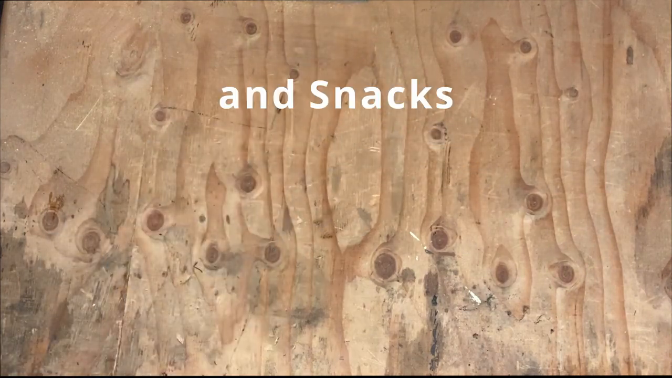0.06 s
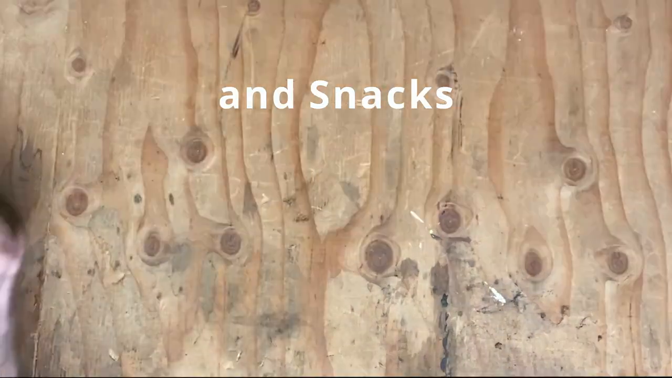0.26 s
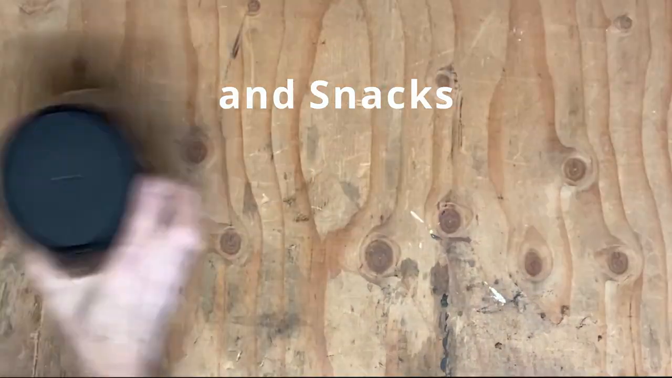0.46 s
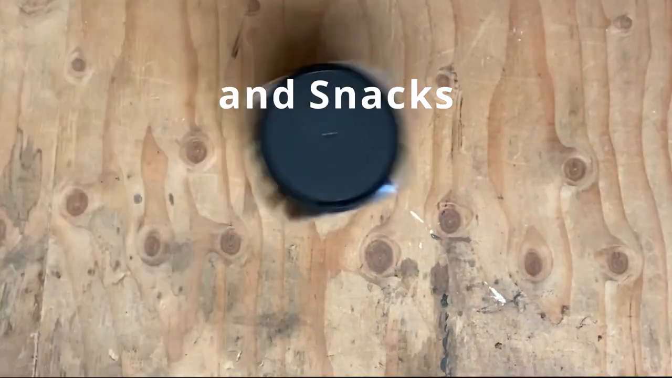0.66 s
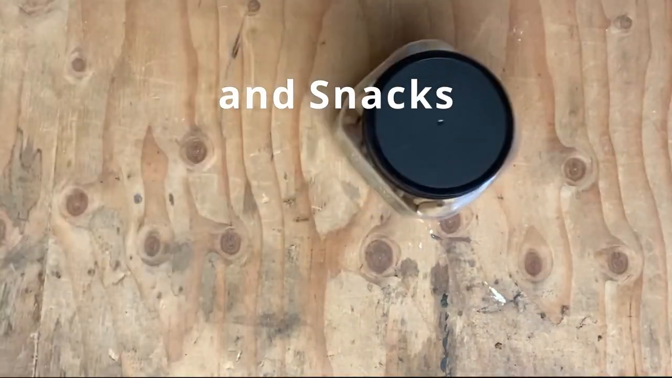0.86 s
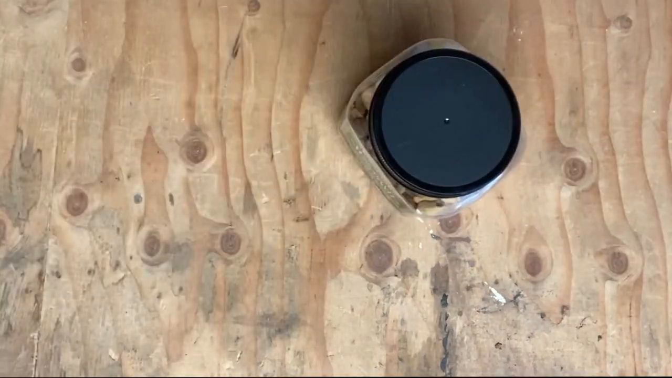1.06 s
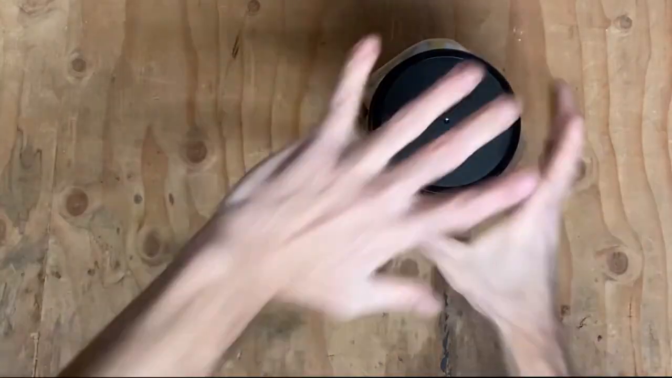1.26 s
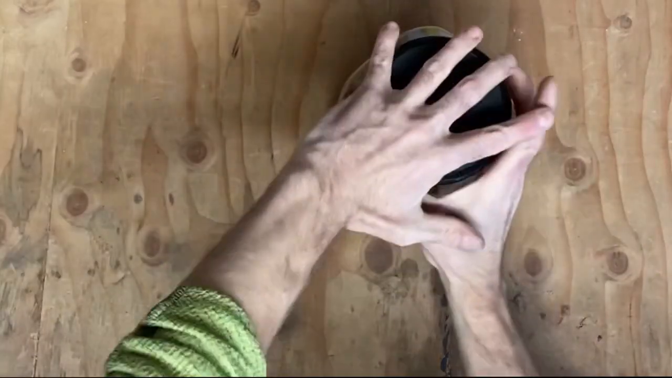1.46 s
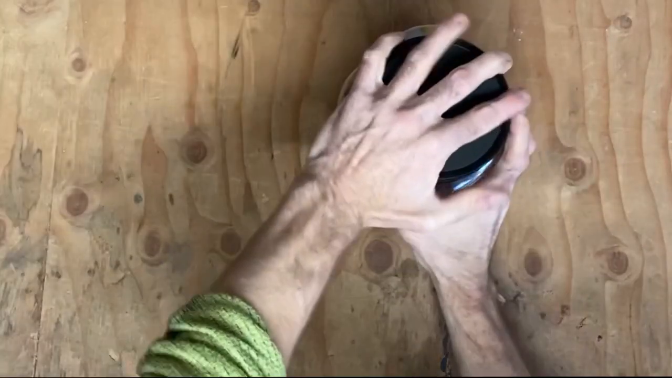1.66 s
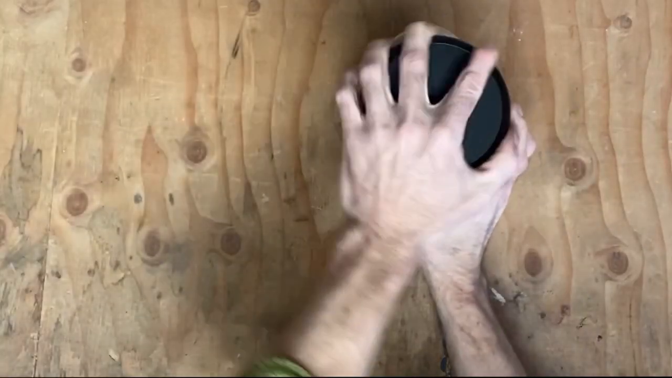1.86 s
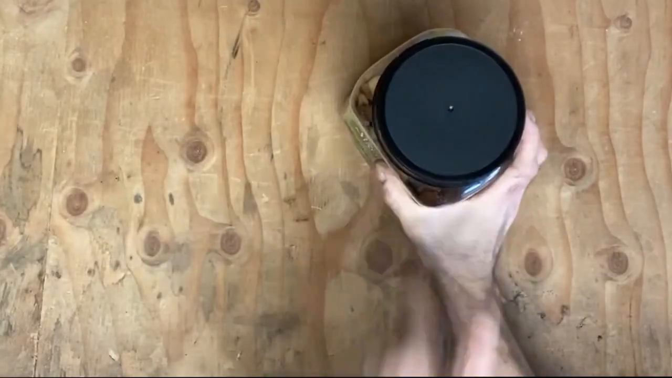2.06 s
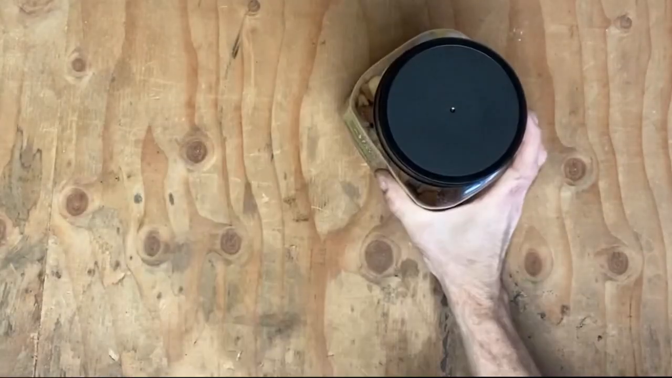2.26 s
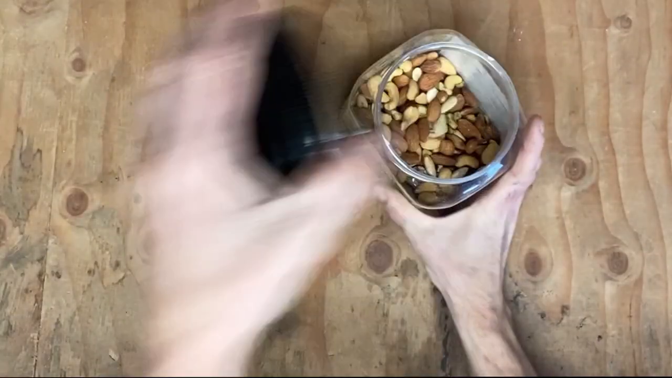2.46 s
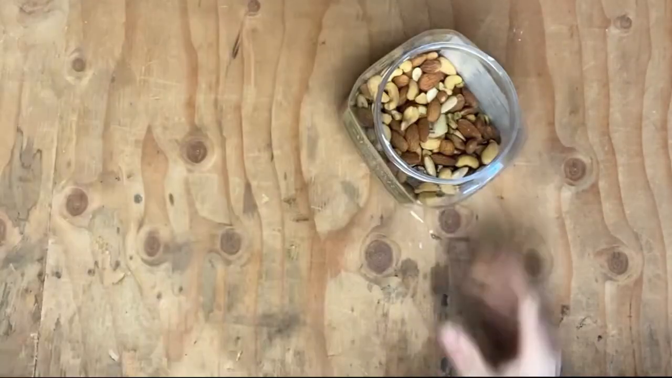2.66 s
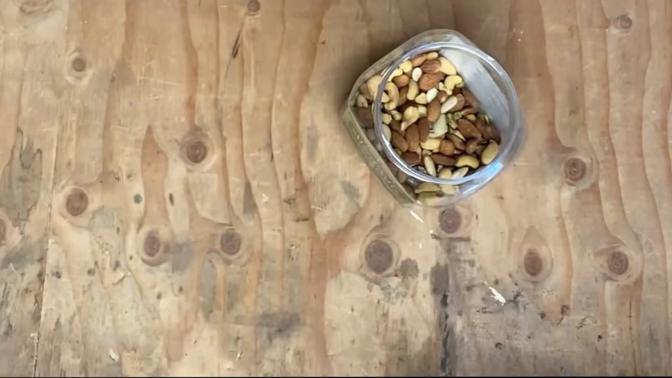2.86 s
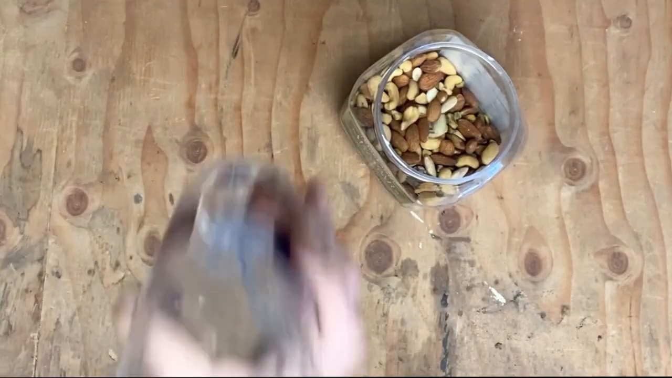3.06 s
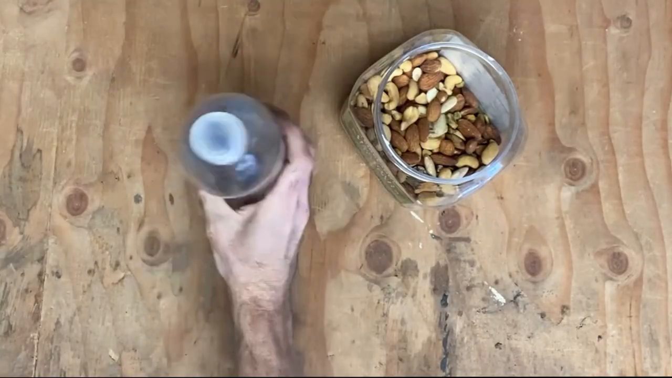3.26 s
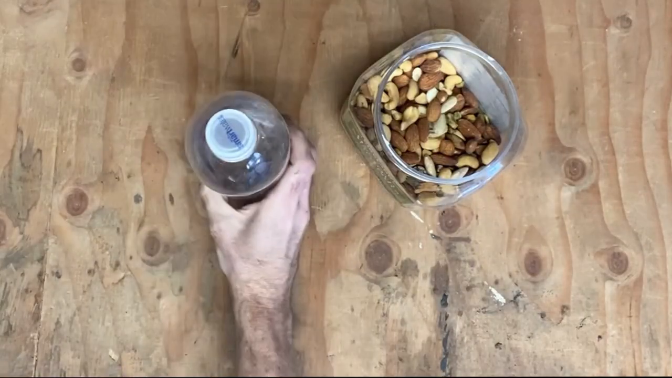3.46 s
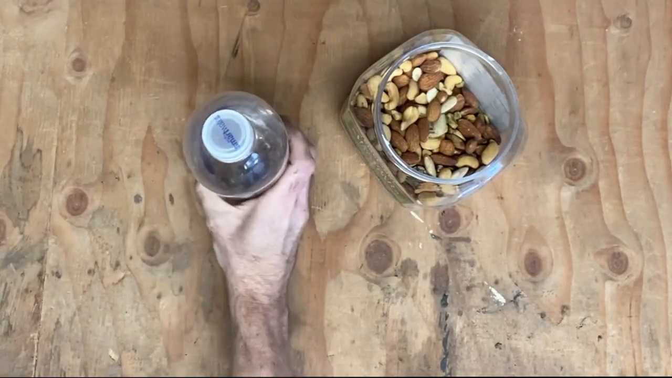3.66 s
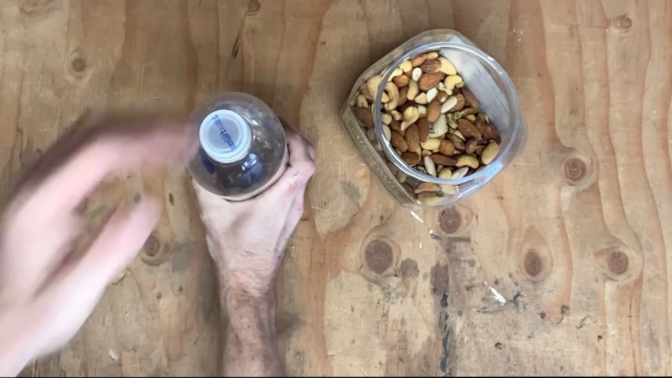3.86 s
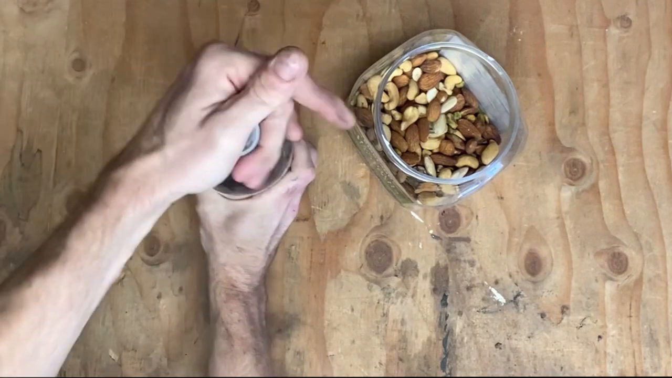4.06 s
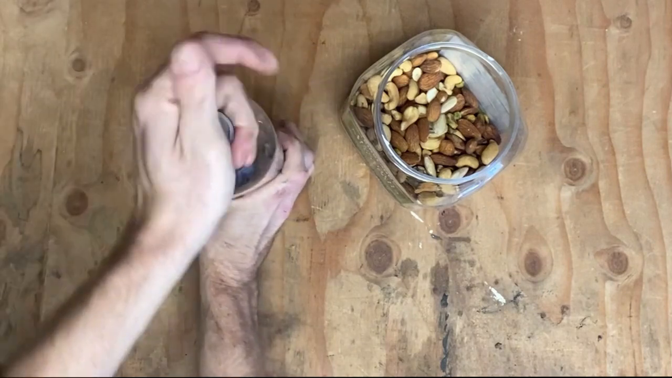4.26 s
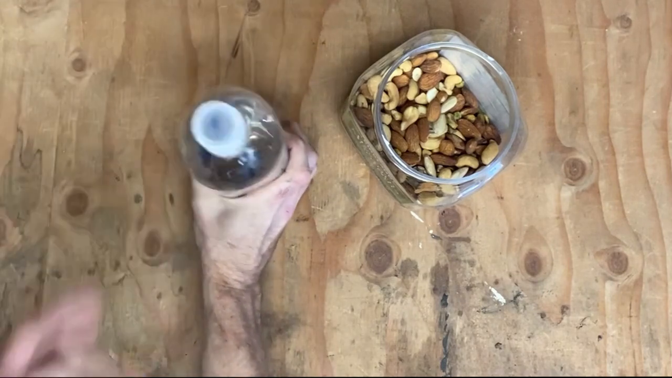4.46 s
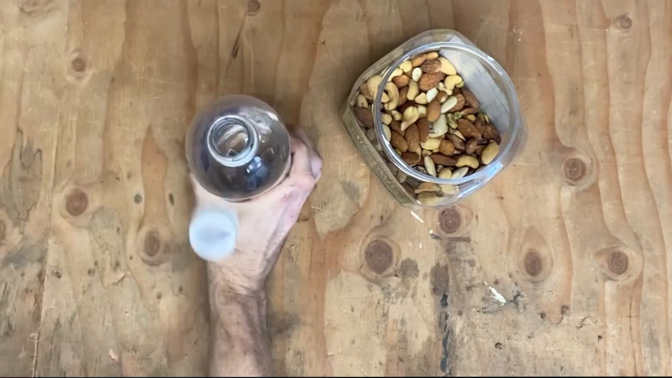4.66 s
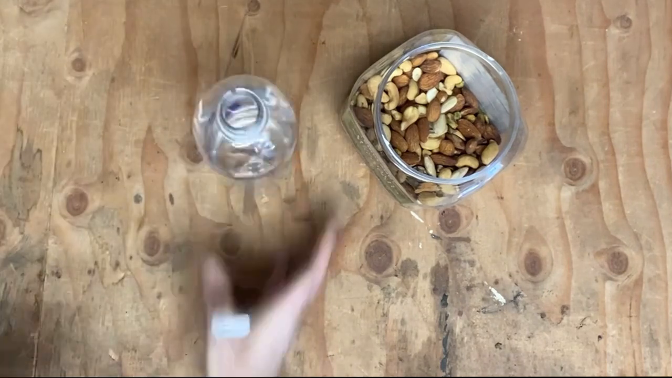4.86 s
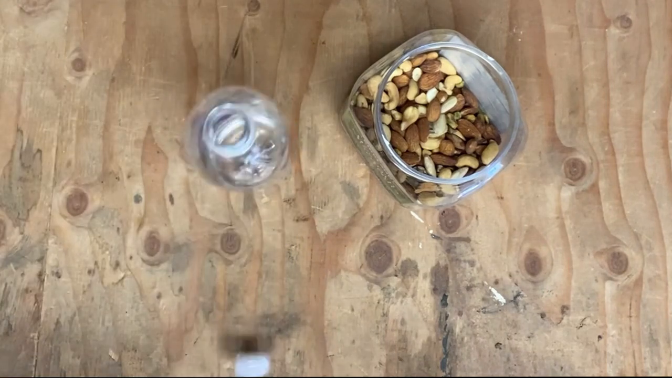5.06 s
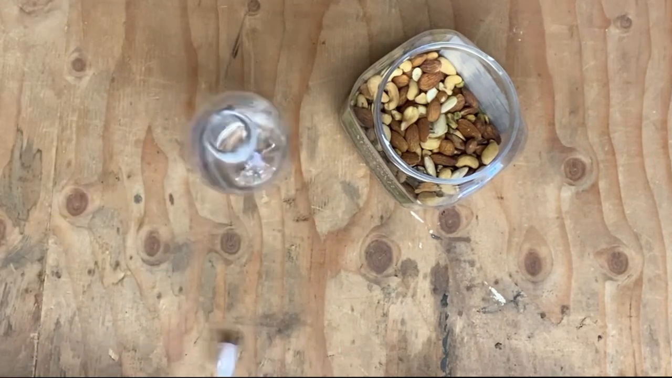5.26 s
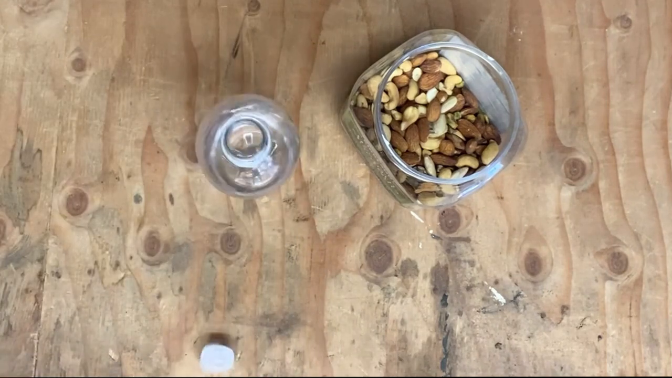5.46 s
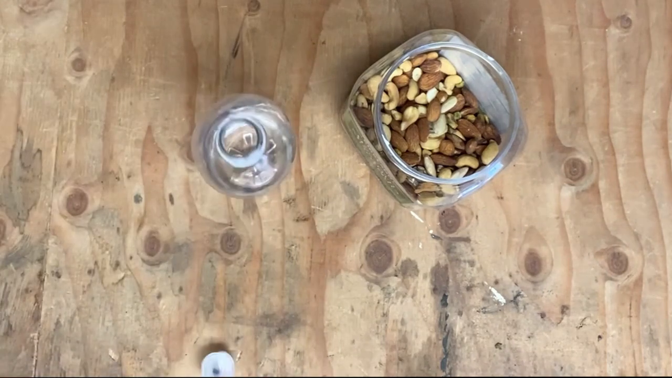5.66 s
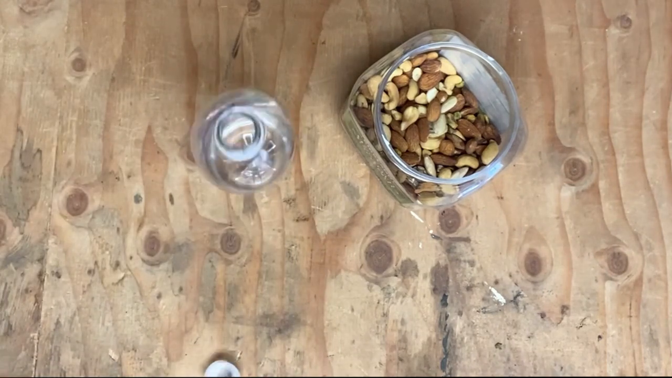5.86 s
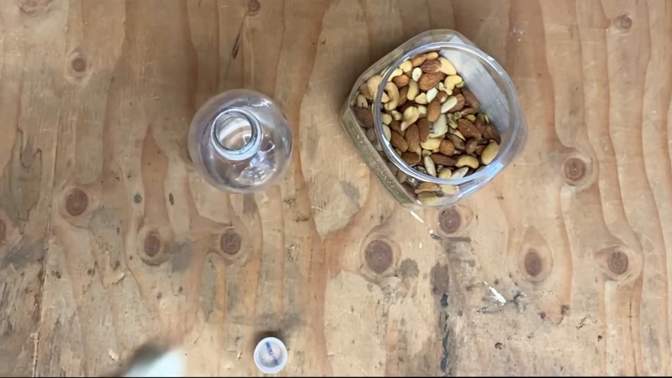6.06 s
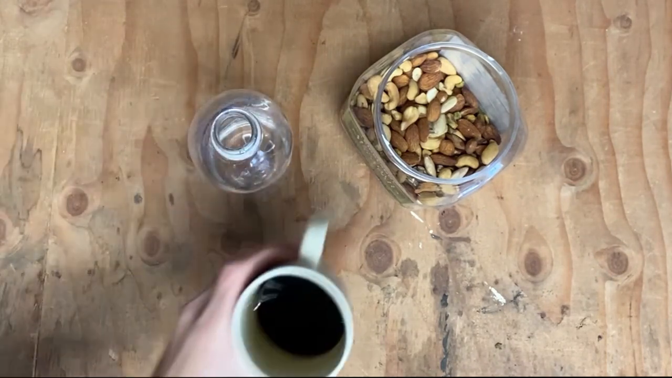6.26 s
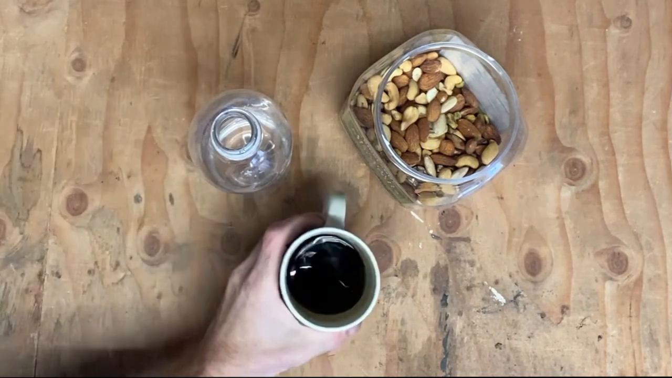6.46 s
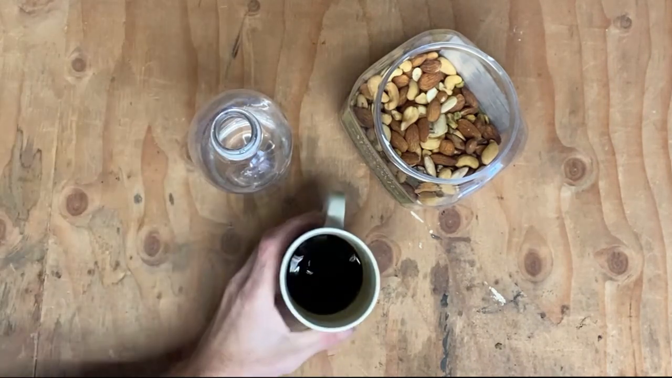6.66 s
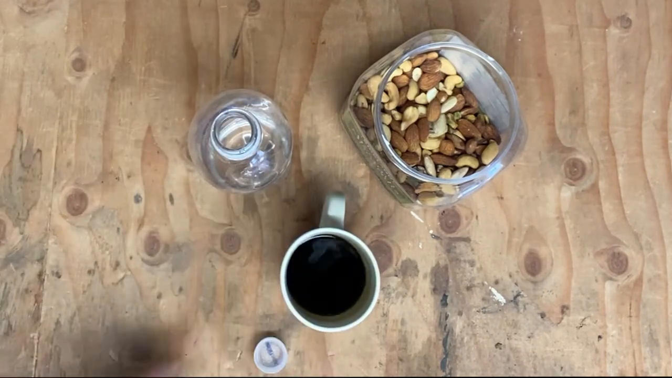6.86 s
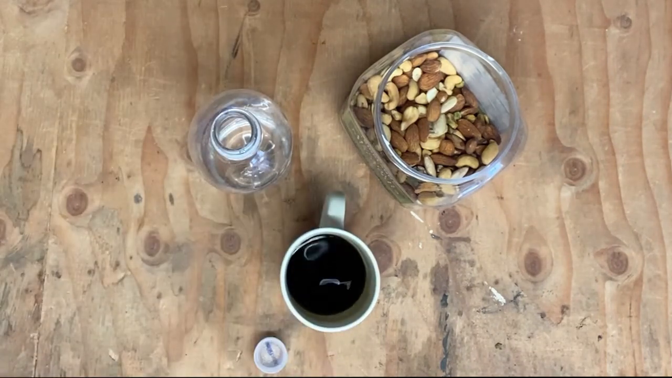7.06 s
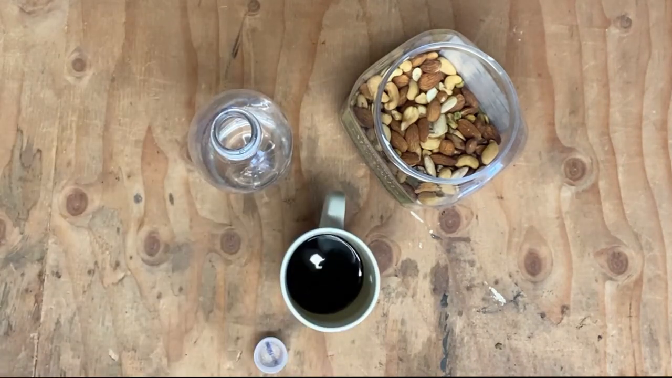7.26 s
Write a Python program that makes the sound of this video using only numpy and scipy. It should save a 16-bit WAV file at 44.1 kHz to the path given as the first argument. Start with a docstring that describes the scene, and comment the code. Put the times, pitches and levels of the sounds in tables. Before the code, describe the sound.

Close knocks and scrapes on wood as a jar and plastic bottle are opened, a cap bounces, and a mug lands.

```python
"""Jar, bottle and mug on a wooden table

A nut jar slides over the table and loses its screw lid; a plastic bottle is set down, its cap is
twisted off and bounces away; a full mug lands last. Impacts excite the damped modes of the thing
struck and, a moment later, of the table top; stick-slip friction sounds between the blows.
A phone held close above picks it all up in a small quiet room."""
import sys
import numpy as np
from scipy import signal
from scipy.fft import rfft, irfft, next_fast_len
from scipy.io import wavfile
from scipy.ndimage import uniform_filter1d

SR = 44100
rng = np.random.default_rng(int(sys.argv[2]) if len(sys.argv) > 2 else 0)


def log_audio(samples):
    """Write samples as a 16-bit WAV file to the path given in sys.argv[1]."""
    # one column per channel
    frames = np.atleast_2d(samples).T
    # limit to full scale, then quantise
    limited = np.clip(frames, -1, 1)
    pcm = np.round(limited * 32767).astype(np.int16)
    wavfile.write(sys.argv[1], SR, pcm)


N = 322812
T = np.arange(N) / SR
ANTIPHASE = np.array([[1], [-1]])
TWIST_DB_PER_S, HAND_DB_PER_S, HUM_DB_PER_S = (905, 498), (905, 256), (245, 150)  # rise, fall

# Normal modes. Each row: frequency in Hz, relative level in dB, t60 in seconds (body() limits the
# t60 of lid and cap). The table's first three rows are its bass modes, the rest its upper modes.
TABLE_MODES = [(64, -36, .16), (80.7, -4, 0.1), (100, -10.5, 0.092), (172.1, 4, 0.1), (225.2, 1.5, 0.079),
               (252, 3, 0.088), (330, -12, 0.027), (365, -12, 0.11)]
LID_MODES = [(400, -1, 0.034), (1100, 10, 0.028), (1520, 16, .025), (2190, 3.5, 0.0083), (3500, 4, .008),
             (4560, 14, 0.0091), (5270, 8, .008)]
CAP_MODES = [(1120, -2, 0.018), (1820, 4, 0.02), (2050, 5, 0.02), (2980, -2.5, 0.02), (3740, 16, 0.02),
             (4310, 9.5, 0.01), (5460, -15.5, 0.018), (6700, 27, 0.03)]
# Blows to the table top. Each row: start in seconds, peaks of the bass and upper modes in dB.
TABLE_THUMPS = [(0.227, -10.5, -5), (0.237, -2.5, -34), (0.342, -20, -22), (0.423, -8, -4.5),
                (0.498, -8, -11.5), (0.513, -25, -12.5), (0.558, -32, -24.5), (0.65, -47, -20),
                (1.371, -32, -42.5), (1.444, -24, -47), (1.82, -34.5, -36), (2.002, -40, -13),
                (2.016, -15, -21), (2.101, -30.5, -23.5), (2.331, -32.5, -42), (2.901, -30.5, -35.5),
                (3.227, -7, -7), (3.243, -7.5, -10), (3.259, -23, -22), (3.735, -35.5, -30.5),
                (3.982, -42, -32), (4.106, -27.5, -24.5), (4.377, -29, -22), (4.464, -31, -31.5),
                (4.742, -34, -31.5), (4.905, -29, -38.5), (5.031, -18.5, -23.5), (5.211, -25, -27),
                (5.298, -28, -34.5), (5.366, -28.5, -31), (5.5, -29, -30), (5.615, -28, -29),
                (5.639, -26.5, -32.5), (5.742, -27.5, -26), (5.849, -26, -43.5), (5.941, -30.5, -40),
                (6.263, -28.5, -29.5), (6.393, -7, -8.5), (6.402, -8, -6), (6.831, -21.5, -55),
                (6.873, -20.5, -27), (7.158, -22, -38.5)]
# Strokes of rubbing. Each row: start and hold in seconds, then levels in dB of the bright half,
# the dull half, the table's bass hum and its upper hum.
LID_STROKES = [(1.811, 0.028, -46, -51.5, -39, -57.5), (1.88, 0.068, -56, -63.5, -46.5, -72),
               (1.946, 0.043, -41.5, -49.5, -46, -57), (1.994, 0.013, -34, -33.5, -40, -38),
               (2.084, 0.0085, -34, -37, -37, -33.5)]
CAP_STROKES = [(4.196, 0.063, -48.5, -58, -48.5, -58.5), (4.29, 0.019, -55, -50, -49, -45),
               (4.352, 0.034, -34, -39.5, -45, -59), (4.4, 0.086, -42, -41.5, -55, -45),
               (4.5, 0.045, -51, -42, -51, -50.5)]
HAND_STROKES = [(0, 0.074, -64, -54.5, -42.5, -42.5), (1.304, 0.22, -65.5, -65, -43.5, -62),
                (1.419, 0.075, -57, -69, -40, -55), (1.55, 0.087, -60, -80, -66, -74),
                (1.69, 0.036, -58.5, -66, -47, -61), (2.337, 0.026, -69, -63, -53, -48.5),
                (2.429, 0.0084, -67, -78, -50, -75), (2.903, 0.068, -53.5, -68.5, -66, -78),
                (3.06, 0.22, -69.5, -86, -50, -71), (3.359, 0.099, -69.5, -60, -45, -45),
                (3.968, 0.037, -62.5, -62.5, -44, -61), (4.728, 0.012, -53.5, -53.5, -44, -56),
                (4.77, 0.077, -59.5, -85, -49.5, -56), (4.885, 0.1, -58, -67, -45, -59),
                (5.38, 0.039, -64, -58.5, -45.5, -57), (5.55, 0.067, -93, -61.5, -42.5, -58.5),
                (5.84, 0.06, -72.5, -57.5, -43, -50), (6.038, 0.0068, -53.5, -58.5, -40.5, -56.5),
                (6.091, 0.021, -65, -60.5, -40, -55.5), (6.2, 0.27, -71, -62.5, -53, -51),
                (6.45, 0.17, -67.5, -50, -34.5, -40), (6.772, 0.035, -47, -50.5, -42, -59),
                (6.849, 0.032, -64, -45, -26.5, -29.5), (6.898, 0.14, -66, -64.5, -47, -56),
                (7.06, 0.15, -69.5, -62.5, -33, -41), (7.19, 0.14, -73.5, -65, -43, -47)]


def undb(db):
    return 10 ** (np.asarray(db) / 20)


def unit(x):
    return x / np.sqrt(np.mean(x ** 2))


def peak(x, db):
    return x * undb(db) / np.abs(x).max()


def add(out, sound, s):
    i = int(s * SR)
    out[i:i + len(sound)] += sound[:len(out) - i]


def band(x, lo_hz, hi_hz):
    return signal.sosfilt(signal.butter(2, [lo_hz, hi_hz], "band", fs=SR, output="sos"), x)


def halves(x, split_hz=2500):
    """A crossover divides a sound into a dull and a bright half."""
    return [signal.sosfilt(signal.butter(4, split_hz, kind, fs=SR, output="sos"), x)
            for kind in ("low", "high")]


def colour(x, points):
    """Spectral shaping by (Hz, dB) points joined on a log axis."""
    size = next_fast_len(N + SR // 4)
    hz, db = np.transpose(points)
    gain = undb(np.interp(np.log(np.arange(size // 2 + 1) * SR / size + 1), np.log(hz), db))
    return irfft(rfft(x, size) * gain, size)[..., :N]


def ring(modes, scatter_db=0, detune=0, swell_cycles=0, size=SR // 3):
    """Free vibration is a sum of damped sines, here scattered at random in level and pitch."""
    hz, db, t60 = np.transpose(modes)[:, :, None]
    t = np.arange(size) / SR
    if scatter_db or detune:
        level_draw, pitch_draw = rng.standard_normal((2, len(modes), 1))
    else:
        level_draw = pitch_draw = 0
    gain = undb(db + scatter_db * level_draw) * (1 - np.exp(-t * hz / (swell_cycles + 1e-3)))
    sines = np.sin(2 * np.pi * hz * (1 + detune * pitch_draw) * t)
    return (gain * sines * 1000 ** (-t / t60)).sum(axis=0)


def body(modes, longest_s, longest_cycles=24):
    """Mode splitting: in thick plastic and clay each mode is a heavily damped cluster."""
    cluster = np.repeat(modes, 6, axis=0)
    cluster[:, 2] = np.minimum(cluster[:, 2], np.minimum(longest_s, longest_cycles / cluster[:, 0]))
    return ring(cluster, scatter_db=2.5, detune=.035, size=SR // 20)


def blows(events, modes, chatter_s, crack_db, lag_samples):
    """Impact excitation: a chattering contact radiates a crack and drives the body's modes."""
    out, t = np.zeros((2, N)), np.arange(SR // 10) / SR
    delay = np.exp(-2j * np.pi * lag_samples * np.fft.rfftfreq(len(t)))
    for s, dull_db, bright_db in events:
        chatter = rng.standard_normal(len(t)) * np.exp(-(t / chatter_s) ** 2)
        chatter *= np.clip(t / 0.00023, 0, 1)
        force = unit(chatter) / np.sqrt(len(t))
        force[0] += 1.2  # the first contact
        tone = signal.fftconvolve(body(modes, longest_s=.03), force)[:len(t)]
        dull, bright = halves(peak(tone, 0) + peak(band(chatter, 650, 6700), crack_db))
        sound = peak(dull, dull_db) + peak(bright, bright_db)
        late = irfft(rfft(sound) * delay, len(t))
        add(out[0], late * undb(-.75), s)  # later and softer on the left
        add(out[1], sound * undb(.75), s)
    return out


def grit(per_s, spread_db, smooth):
    """Stick-slip friction: catches of uneven size modulate a smooth hiss in each channel."""
    catches = (rng.random(N) < per_s / SR) * undb(np.clip(spread_db * rng.exponential(size=N), 0, 8))
    return (unit(uniform_filter1d(catches, SR // 300)) + smooth) * rng.standard_normal((2, N))


def resonate(friction, modes, hiss_db):
    """Forced vibration: friction drives a body's modes, and some hiss radiates directly."""
    tone = signal.fftconvolve(friction, body(modes, longest_s=.015)[None], axes=1)[:, :N]
    return unit(tone) + undb(hiss_db) * unit(band(friction, 780, 11000))


def swells(start, hold, db, rise_db_per_s, fall_db_per_s):
    """Incoherent strokes rise, hold and fall; their powers add to one gain curve."""
    t = T[::200, None]
    down = rise_db_per_s * np.maximum(start - t, 0) + fall_db_per_s * np.maximum(t - start - hold, 0)
    return np.interp(T, t[:, 0], np.sqrt((undb(db - down) ** 2).sum(axis=1)))


def strokes(rows, slopes):
    """Bright and dull amplitude envelopes of a series of strokes."""
    start, hold, bright_db, dull_db = np.transpose(rows)[:4]
    return swells(start, hold, bright_db, *slopes), swells(start, hold, dull_db, *slopes)


def rub(gains, friction, crosstalk=0.17):
    """Amplitude modulation: each half of the friction noise follows its own envelope."""
    dull, bright = map(unit, halves(friction + crosstalk * friction[::-1]))
    return gains[0] * bright + gains[1] * dull


def room_hush():
    """Steady background noise, coherent between the channels in the bass."""
    # Each row: frequency in Hz, relative spectral density in dB.
    spectrum = [(24, -21), (40, 6.5), (94, 0), (284, -24.5), (2850, -51.5), (5940, -42.5), (7400, -45.5),
                (14000, -44.5)]
    mid, side = colour(rng.standard_normal((2, N)), spectrum)
    return undb(-54.5) * unit(mid + band(side, 400, 14000) * ANTIPHASE)


def hands():
    """Skin friction makes a nearly smooth hiss that persists faintly at rest."""
    # Each row: frequency in Hz, relative spectral density in dB.
    spectrum = [(350, -5), (700, 9), (1500, 2.5), (3000, -3.5), (7000, -3.5), (14000, -13)]
    gains = strokes(HAND_STROKES, HAND_DB_PER_S) + undb([[-78.5], [-84.5]])
    return rub(gains, colour(grit(110, spread_db=4.7, smooth=8.4), spectrum))


def table_hum():
    """Forced vibration: rubbing, the skid and the wake of each thump keep the table humming."""
    start, hold, _, _, bass_db, upper_db = np.transpose(LID_STROKES + CAP_STROKES + HAND_STROKES)
    thump_s, bass_peak_db, upper_peak_db = np.transpose(TABLE_THUMPS)
    out = 0
    for modes, stroke_db, wake_db, fade_db_per_s, skid_db, rest_db in (
            (TABLE_MODES[:3], bass_db, bass_peak_db - 14.5, 110.5, 14, -55.5),
            (TABLE_MODES[3:], upper_db, upper_peak_db - 22, 132, 3, -79.5)):
        hum = unit(signal.fftconvolve(rng.standard_normal(N), ring(modes, swell_cycles=0.41))[:N])
        rubbing = swells(start, hold, stroke_db, *HUM_DB_PER_S)
        wake = swells(thump_s, 0, wake_db, 91000, fade_db_per_s)
        skid = undb(skid_db) * skid_gains()[0]
        out += np.sqrt(rubbing ** 2 + wake ** 2 + skid ** 2 + undb(rest_db) ** 2) * hum
    return out


def skid_gains():
    """Bright and dull amplitude envelopes of the jar as it skids, rocks and slows."""
    # Each row: time in seconds, bright and dull levels in dB.
    levels = [(0.217, -47, -33), (0.236, -43.5, -31.5), (0.3, -42, -45.5), (0.4, -40.5, -52),
              (0.46, -39, -36), (0.53, -37, -42.5), (0.56, -40.5, -33.5), (0.601, -39, -47),
              (0.701, -40, -46), (0.821, -46, -57), (0.87, -55, -59.5), (0.931, -70, -77)]
    s, bright_db, dull_db = np.transpose(levels)
    return [undb(np.interp(T, s, db, -200, -200)) for db in (bright_db, dull_db)]


def jar_skid():
    """Sliding friction of the jar on wood makes a grainy broadband noise."""
    # Each row: frequency in Hz, relative spectral density in dB.
    spectrum = [(400, -4), (600, -1.5), (900, -3), (1520, -5.5), (2000, -13), (2750, -16.5), (3350, -13),
                (5000, -16), (9000, -16), (14000, -17)]
    return rub(skid_gains(), colour(grit(211.7, spread_db=23, smooth=1.7), spectrum))


def wood_knocks():
    """Impacts on wood excite damped modes and sound dull."""
    # Each row: start in seconds, dull and bright peaks in dB.
    knocks = [(0.225, -15, -21.5), (0.422, -19, -32), (0.466, -35, -45), (0.497, -21, -50),
              (0.513, -25, -50), (0.546, -27, -42), (0.566, -37, -44), (5.498, -36.5, -59),
              (5.614, -46, -67)]
    # Each row: frequency in Hz, relative level in dB, t60 in seconds before body() limits it.
    modes = [(460, -13, 0.039), (900, -2.5, 0.048), (1215, -6, 0.035), (1570, -3, 0.03),
             (3330, -1.5, 0.005), (4200, 7.5, 0.014)]
    return blows(knocks, modes, chatter_s=0.018, crack_db=-19, lag_samples=7.4)


def table_thumps():
    """A struck plate takes some cycles to swell, so its upper modes answer before its bass."""
    out = np.zeros(N)
    for s, bass_db, upper_db in TABLE_THUMPS:
        for modes, db in ((TABLE_MODES[:3], bass_db), (TABLE_MODES[3:], upper_db)):
            add(out, peak(ring(modes, scatter_db=0.21, detune=0.048, swell_cycles=1.32), db), s)
    return out


def lid_ticks():
    """Brief impacts set the jar's lid in free vibration."""
    # Each row: start in seconds, dull and bright peaks in dB.
    ticks = [(1.808, -47, -28.5), (1.984, -27, -22.5), (2.001, -29, -20.5), (2.042, -35, -23.5),
             (2.066, -33, -25), (2.08, -36, -16), (2.098, -27, -15.5)]
    return blows(ticks, LID_MODES, chatter_s=0.0061, crack_db=-18.5, lag_samples=1)


def lid_twist():
    """Stick-slip friction drives the modes of the turning lid."""
    friction = grit(186, spread_db=2.9, smooth=2.4)
    return rub(strokes(LID_STROKES, TWIST_DB_PER_S), resonate(friction, LID_MODES, hiss_db=6.5))


def jar_air():
    """Cavity resonance: the air in the jar hums while the lid turns."""
    dull_gain = strokes(LID_STROKES, HUM_DB_PER_S)[1]
    return undb(-4) * dull_gain * unit(band(rng.standard_normal((2, N)), 277, 400))


def bottle_taps():
    """Taps excite the heavily damped modes of the held bottle."""
    # Each row: start in seconds, dull and bright peaks in dB.
    taps = [(2.899, -49, -57), (3.735, -16.5, -39.5), (4.107, -27, -61.5)]
    # Each row: frequency in Hz, relative level in dB, t60 in seconds before body() limits it.
    modes = [(444, -12, 0.015), (800, -20.5, 0.036), (1000, 1, 0.028), (1410, 3.5, 0.01),
             (1830, 2.5, 0.0087), (2346, -7, 0.0088), (3400, -2, 0.0056), (4280, 0.5, .008)]
    return blows(taps, modes, chatter_s=0.013, crack_db=-10, lag_samples=2.7)


def skin_squeaks():
    """Stick-slip oscillation of skin on smooth walls: rough glides that start fast and level off."""
    # Each row: start and length in seconds, first and last pitch in Hz, left peak in dB.
    glides = [(3.058, 0.024, 4170, 7200, -45.5), (5.403, 0.0277, 6650, 5900, -44.5),
              (6.542, 0.035, 4940, 6360, -47.5)]
    out = np.zeros(N)
    for s, length, start_hz, end_hz, db in glides:
        u = np.linspace(0, 1, int(length * SR))
        wobble = 1 + 0.05 * unit(uniform_filter1d(rng.standard_normal(len(u)), 40))
        hz = (start_hz + (end_hz - start_hz) * np.sqrt(u)) * wobble
        add(out, undb(db) * np.sin(np.pi * u) * np.sin(2 * np.pi * np.cumsum(hz) / SR), s)
    return out * np.array([[1], [.6]])


def bottle_landing():
    """Three quick impacts excite the bottle's modes as it is set down."""
    # Each row: start in seconds, dull and bright peaks in dB.
    impacts = [(3.223, -5.5, -10.5), (3.237, -6.5, -14.5), (3.247, -24, -15.5)]
    # Each row: frequency in Hz, relative level in dB, t60 in seconds before body() limits it.
    modes = [(835, -20.5, 0.016), (1020, -7.5, 0.028), (1305, -11.5, 0.016), (1500, 2, 0.017),
             (1670, 13.5, 0.023), (1908, -3.5, 0.028), (2330, -17, 0.017), (3320, -14.5, 0.013),
             (5800, -14.5, .007)]
    return blows(impacts, modes, chatter_s=0.0082, crack_db=-15, lag_samples=3.5)


def plastic_creaks(half_width=0.044, rise_db_per_s=2500, fall_db_per_s=898):
    """Gripped plastic creaks: each burst of noise excites one narrow resonance."""
    # Each row: start and hold in seconds, frequency in Hz, level in dB.
    creaks = [(4.187, 0.032, 2070, -54), (4.351, 0.016, 2850, -36), (4.353, 0.018, 2220, -39),
              (4.353, 0.017, 1680, -44), (4.909, .014, 1710, -56.5)]
    out, t = np.zeros(N), np.arange(SR // 6) / SR - .02
    for s, hold, hz, db in creaks:
        down = rise_db_per_s * np.maximum(-t, 0) + fall_db_per_s * np.maximum(t - hold, 0)
        tone = band(rng.standard_normal(len(t)), hz * (1 - half_width), hz * (1 + half_width))
        add(out, undb(db - down) * unit(tone), s + t[0])
    return out


def cap_twist():
    """Stick-slip friction drives the modes of the turning bottle cap."""
    friction = grit(110, spread_db=3, smooth=1.2)
    return rub(strokes(CAP_STROKES, TWIST_DB_PER_S), resonate(friction, CAP_MODES, hiss_db=-2.5))


def cap_ticks():
    """Small impacts set the turning cap in free vibration."""
    # Each row: start in seconds, dull and bright peaks in dB.
    ticks = [(4.279, -36, -52), (4.297, -30, -18.5), (4.354, -43, -30), (4.425, -50, -34), (4.44, -43, -29),
             (4.469, -39, -14.5), (4.492, -36, -32), (4.528, -45.5, -35), (4.538, -31, -23.5)]
    return blows(ticks, CAP_MODES, chatter_s=0.0095, crack_db=-8.5, lag_samples=2.65)


def cap_bounces():
    """Each rebound excites the high modes of the loose cap."""
    # Each row: start in seconds, dull and bright peaks in dB.
    bounces = [(5.024, -16, -2.5), (5.206, -19, -19.5), (5.295, -22.5, -46), (5.354, -32, -52),
               (5.384, -35.5, -44.5), (5.7, -45.5, -58), (5.737, -39, -46), (5.844, -55, -44.5),
               (5.867, -49, -46), (5.89, -44, -49), (6.209, -51.5, -35.5), (6.488, -46.5, -39.5),
               (6.578, -39, -44), (6.641, -41, -46), (6.652, -41, -48), (6.703, -39.5, -42.5)]
    # Each row: frequency in Hz, relative level in dB, t60 in seconds before body() limits it.
    modes = [(1400, 0.5, .03), (2065, -0.5, .02), (2425, 3.5, .03), (3530, 9, .03), (4100, 13, .03),
             (5000, 3, .02), (5400, -8, .02), (5980, 0, .02), (6560, 10.5, .02)]
    return blows(bounces, modes, chatter_s=0.013, crack_db=-8, lag_samples=2.68)


def mug_landing():
    """Hard contact gives a strong crack and excites the damped modes of the full mug."""
    # Each row: start in seconds, dull and bright peaks in dB.
    impacts = [(6.391, 4, -14.5), (6.399, -7.5, -15.5), (6.852, -31, -33.5), (6.878, -32, -57),
               (7.158, -43, -31.5)]
    # Each row: frequency in Hz, relative level in dB, t60 in seconds before body() limits it.
    modes = [(588, -1, 0.033), (728, 5, 0.032), (906, -0.5, 0.045), (960, 6, 0.0048), (1335, 14.5, 0.004),
             (1830, 0, 0.024), (2260, -2, 0.0097), (3080, -9.5, 0.022), (4080, -6, 0.014)]
    return blows(impacts, modes, chatter_s=0.0064, crack_db=-4, lag_samples=3.2)


def reverberation(x):
    """A diffuse field: a tail of noise in each channel that dies faster in the treble."""
    # Each row: frequency in Hz, t60 in seconds.
    decay_times = [(250, 0.72), (1500, 0.46), (4000, 0.37), (10000, 0.22)]
    points_hz, points_t60 = np.transpose(decay_times)
    t, tail = np.arange(SR // 2) / SR, 0
    for hz in 125 * 2. ** np.arange(7):
        t60 = np.interp(np.log(hz), np.log(points_hz), points_t60)
        tail += band(rng.standard_normal((2, len(t))), hz / 2 ** .5, hz * 2 ** .5) * 1000 ** (-t / t60)
    tail *= np.clip(t / 0.0014, 0, 1)
    tail /= np.sqrt((tail ** 2).sum(axis=1).mean())
    return signal.fftconvolve(x[None], tail, axes=1)[:, :N]


def scene():
    """Superposition of impacts, friction, the table top and the room."""
    hits = (wood_knocks() + lid_ticks() + bottle_landing() + bottle_taps()
            + cap_ticks() + cap_bounces() + mug_landing())
    rubs = (jar_skid() + lid_twist() + cap_twist() + hands()
            + skin_squeaks() + plastic_creaks() + jar_air())
    table = table_thumps() + table_hum()
    # the upper table modes and the low ring of blows reach the two channels unequally
    side = undb(-19) * band(table, 130, 600) + undb(-1.5) * band(hits.mean(axis=0), 350, 800)
    hush = room_hush()
    echo = undb(-12.5) * reverberation((hits + rubs).mean(axis=0) + undb(-18) * table)
    return hits + rubs + table + side * ANTIPHASE + echo + hush


def record(dry, ceiling=.93, top_hz=15700):
    """Band limiting and saturation: no deep bass, rounded peaks, no treble above about 15 kHz."""
    # A narrow dip near 10.5 kHz and a falling top. Each row: frequency in Hz, gain in dB.
    response = [(7000, 0.5), (9500, -0.5), (10100, -18), (10900, -23), (11500, -5.5), (14300, -5),
                (15200, -32.5)]
    thin = signal.sosfilt(signal.butter(3, 52, "high", fs=SR, output="sos"), colour(dry, response))
    rounded = thin / (1 + (thin / ceiling) ** 4) ** (1 / 4)
    return signal.sosfilt(signal.ellip(10, .2, 90, top_hz, fs=SR, output="sos"), rounded)


dry = scene()
out = record(dry)
log_audio(out)
```